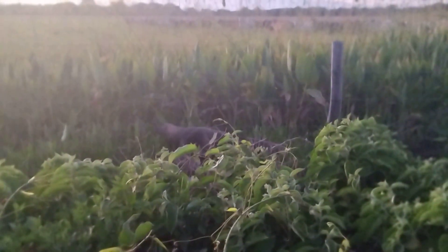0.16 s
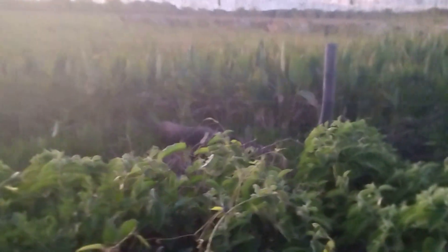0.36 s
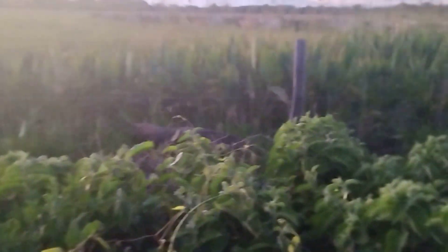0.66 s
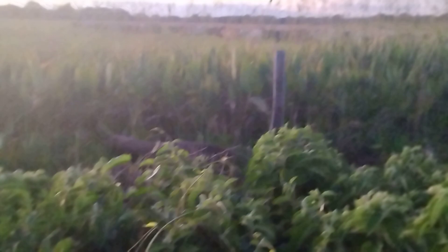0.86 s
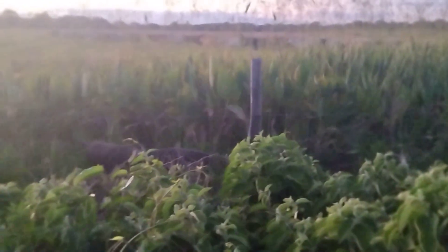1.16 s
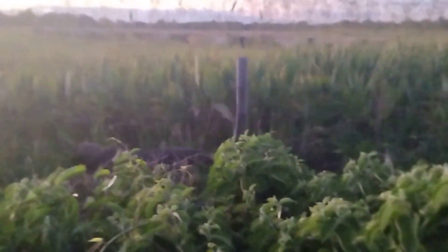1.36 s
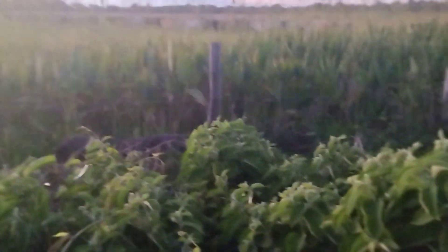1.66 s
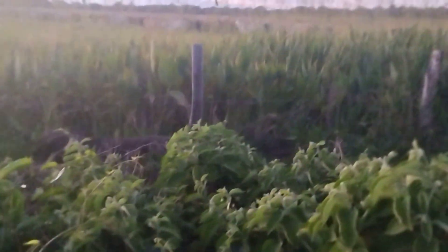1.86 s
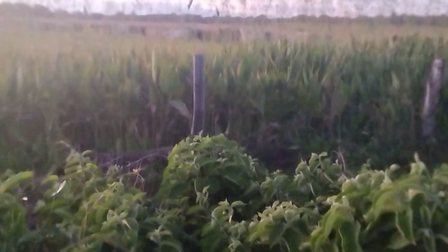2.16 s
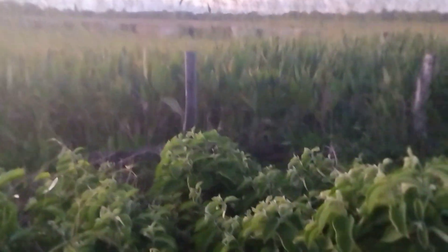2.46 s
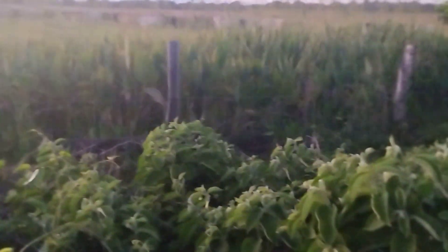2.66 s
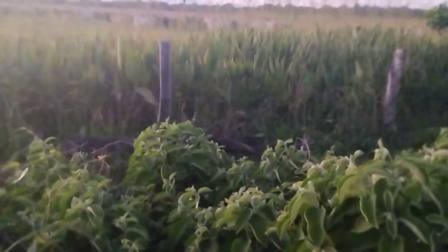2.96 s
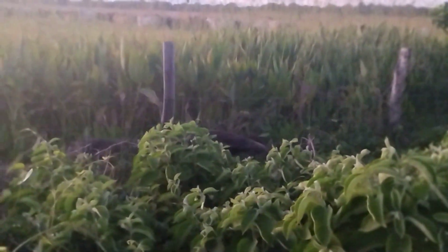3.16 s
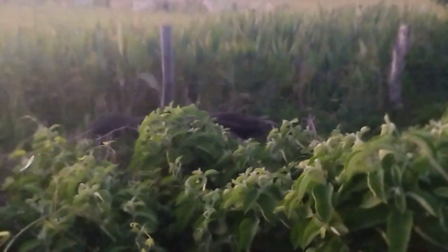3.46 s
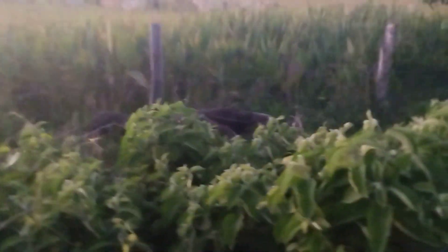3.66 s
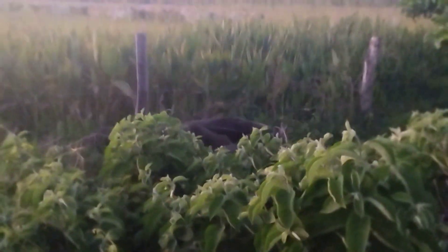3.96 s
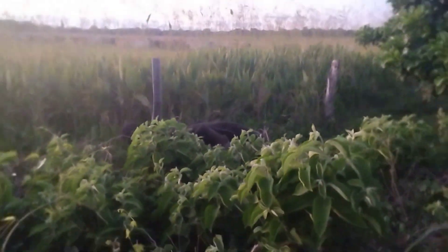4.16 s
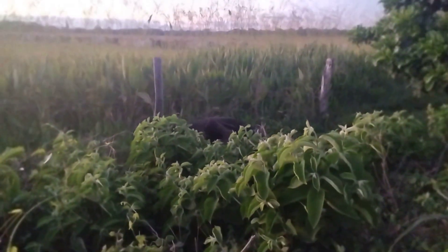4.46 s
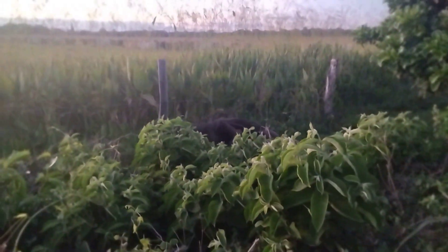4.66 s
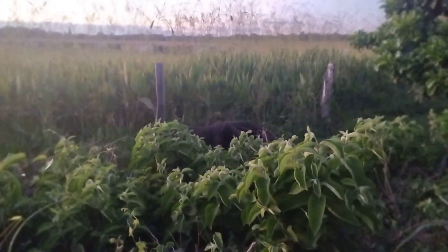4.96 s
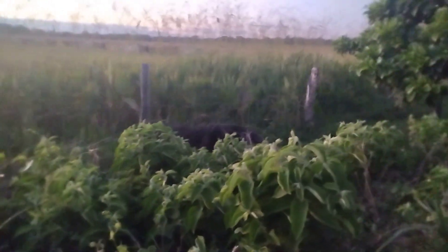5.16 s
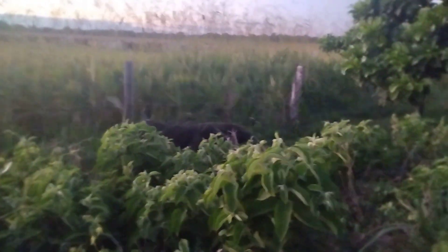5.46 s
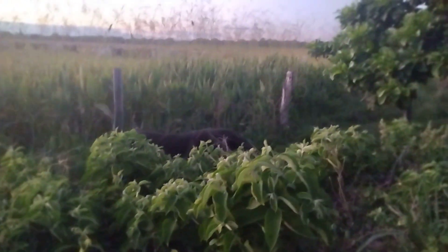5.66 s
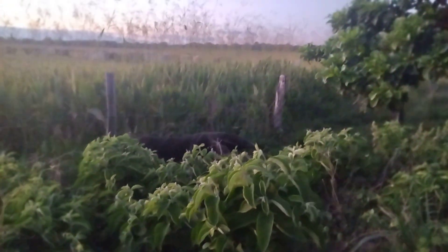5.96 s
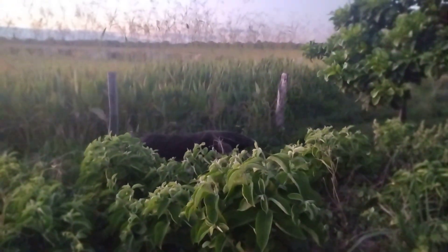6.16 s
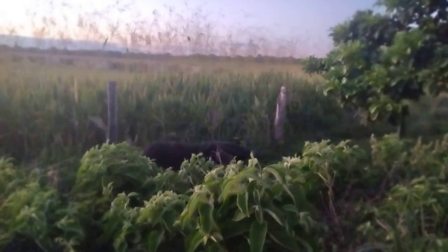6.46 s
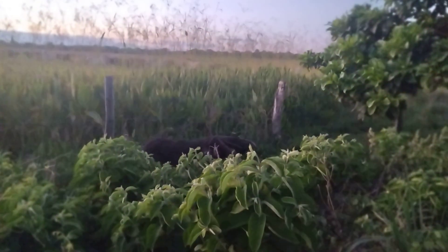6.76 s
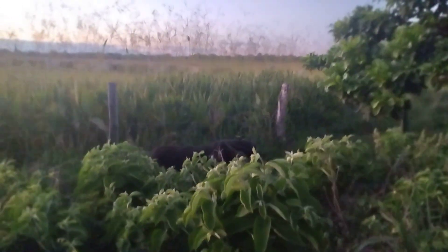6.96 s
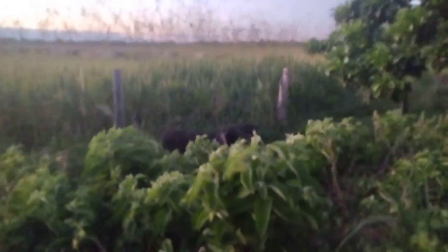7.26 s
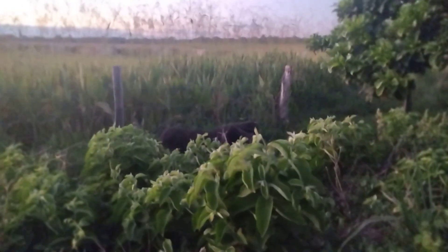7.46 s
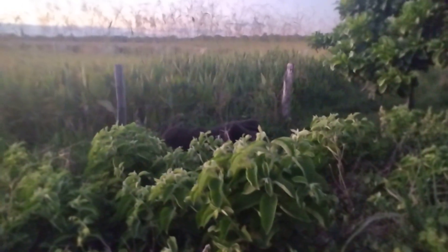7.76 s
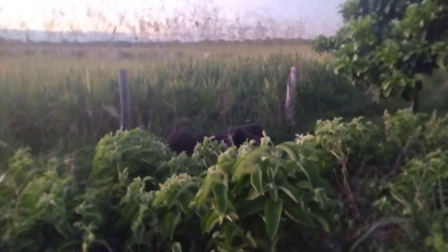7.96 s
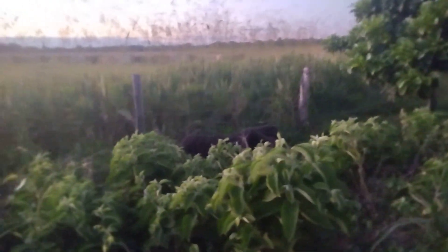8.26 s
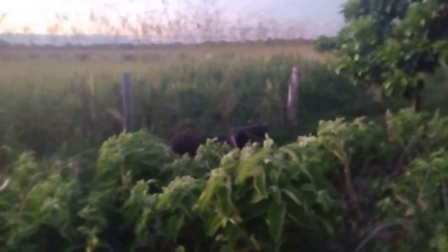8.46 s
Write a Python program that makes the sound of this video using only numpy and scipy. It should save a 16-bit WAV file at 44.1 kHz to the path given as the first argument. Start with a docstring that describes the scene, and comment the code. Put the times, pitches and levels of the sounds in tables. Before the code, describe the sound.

Outdoors in a reedy field, a close cricket trills almost without pause over a shimmering chorus of far insects. A higher, raspier katydid buzzes in half-second phrases, stopping after about five seconds. Faint birds chip and whistle. A single very hard tick hits the microphone near the middle, briefly ducking everything; small stem snaps, knocks and leaf rustles follow. Light air rumble and hiss lie underneath.

```python
"""Dusk at the edge of a reedy field

Air rumbles and hisses faintly under a far insect chorus of noise and a few pulsed tones. A katydid (pulsed
tone and rasp, for five seconds) buzzes above a cricket trilling near 7.5 kHz; leaf echoes scatter both songs.
Birds chip and whistle far off as short gliding tones; filtered noise makes stem snaps and knocks, low thumps
of wind on the microphone and rustling leaves. One hard tick at the microphone rings damped resonances and
makes the recorder's limiter duck."""
import sys
import numpy as np
from scipy import signal
from scipy.fft import rfft, irfft, next_fast_len
from scipy.io import wavfile
from scipy.ndimage import uniform_filter1d, minimum_filter1d, map_coordinates

SR = 44100
rng = np.random.default_rng(int(sys.argv[2]) if len(sys.argv) > 2 else 0)


def persist_wave(psi):
    """Save psi, clipped to +-1, as 16-bit WAV."""
    counts = np.round(np.clip(psi, -1, 1) * 32767).astype(np.int16)
    wavfile.write(sys.argv[1], SR, np.atleast_2d(counts).T)


N = 380123
T = np.arange(N) / SR  # time [s]


def undb(db):
    """Decibels to gain."""
    return 10 ** (np.asarray(db) / 20)


def level(x, db):
    """Set the rms level."""
    return x * undb(db) / np.sqrt(np.mean(x ** 2) + 1e-20)


def curve(rows):
    """Join (time [s], value) rows by straight lines."""
    return np.interp(T, *np.transpose(rows))


def gate(start, end, edge):
    """One between two times, with sloping edges of the given length in seconds."""
    return np.clip(np.minimum(T - start, end - T) / edge + .5, 0, 1)


def walk(rate):
    """Smooth random wander around zero, with spread near one and `rate` knots a second."""
    knots = rng.standard_normal(4096)
    return map_coordinates(knots, [T * rate], order=2, mode="wrap")


def band(x, hz, width):
    """One resonance; a width in Hz sets its damping."""
    return signal.lfilter(*signal.iirpeak(min(hz, .45 * SR), hz / width, fs=SR), x)


def coloured(points):
    """Noise with a (frequency [Hz], relative density [dB]) spectrum that is all but silent beyond its ends."""
    hz, db = np.transpose(points)
    size = next_fast_len(N)
    log_hz = np.log(np.arange(size // 2 + 1) * SR / size + 1)
    shape = undb(np.interp(log_hz, np.log(hz), db, left=-90, right=-90))
    return irfft(rfft(rng.standard_normal(size)) * shape, size)[:N]


def bell(x, centre, width):
    """A smooth hump."""
    return np.exp(-.5 * ((x - centre) / width) ** 2)


def leaves(x, spread_s, sway_rate, count=12):
    """Short echoes off foliage; each comes and goes as the leaves and the listener move."""
    out = np.zeros(N)
    for k in range(count):
        # early echoes crowd together, late ones thin out
        lag = int(SR * spread_s * -np.log(1 - (k + rng.uniform(.2, .9)) / count))
        sway = np.interp(T * sway_rate, np.arange(256), rng.standard_normal(256))
        out[lag:] += (x * sway)[:N - lag]
    return out * np.std(x) / np.std(out)


def add(out, start, sound):
    """Mix a short sound in at a time in seconds."""
    i = max(int(start * SR), 0)
    out[i:i + len(sound)] += sound[:max(N - i, 0)]


def air(land_db=-58, hiss_db=-66):
    """Faint wind and distant land noise with a thin high hiss, all rising and falling with the breeze."""
    # open air: (frequency [Hz], relative density [dB])
    land_spectrum = [(10, 8), (20, -1), (50, -6), (75, -12.5), (160, -14.5), (285, -23.5), (470, -25),
                     (700, -27.5), (1050, -27), (1500, -27.5), (2000, -31.5), (2800, -34.5), (4100, -28.5),
                     (5500, -34.5), (7000, -51)]
    # distant land drone: (frequency [Hz], width [Hz], level before the breeze [dB])
    drone_band = (337, 39, -84.5)
    # strength of the breeze: (time [s], level [dB])
    breeze = [(0, 1), (1.7, 0.2), (2.8, 2), (4, 1.5), (6, .5), (7.6, 0), (8.6, -2.5)]
    land = level(coloured(land_spectrum) * undb(1.0 * walk(4.5)), land_db)
    hz, width, db = drone_band
    drone = level(band(band(rng.standard_normal(N), hz, width), hz, width), db)
    hiss = level(coloured([(5400, -4.4), (9000, 4), (13000, -0.5), (16000, 0.5)]), hiss_db)
    breeze_db = curve(breeze)
    # the hiss follows the breeze twice as strongly
    return (land + drone) * undb(breeze_db) + hiss * undb(2 * breeze_db)


def chorus(pitch_scatter_hz=55, wander_db=-1.0):
    """Many far trills merge into a shimmering band; a few single singers stand out."""
    # far insects: (frequency [Hz], relative density [dB])
    spectrum = [(5600, -60), (6150, -26), (6650, -12.5), (7100, 4), (7600, -2), (8300, -2.5), (9100, -10),
                (10100, -18.5), (11200, -28.5), (12300, -34), (13400, -51), (14400, -27.5), (15600, -31)]
    # the far insects together: (time [s], level [dB])
    loudness = [(0, -42), (2, -41.5), (4, -40.8), (5.3, -41), (5.7, -42.5), (6.3, -40), (7.2, -41.3),
                (7.8, -43.3), (8.6, -43.3)]
    # single far crickets: (start [s], end [s], pitch [Hz], syllable rate [1/s], level [dB])
    neighbours = [(0, 8.62, 7935, 36, -50), (2.1, 7, 8170, 42, -51), (6.15, 8.62, 6800, 84, -52),
                  (2.15, 3.24, 6300, 145, -60)]
    shimmer_db = 1.3 * walk(180) + 1.9 * walk(8)
    out = level(coloured(spectrum) * undb(shimmer_db), 0) * undb(curve(loudness))
    for start, end, pitch_hz, rate, db in neighbours:
        place = T * rate % 1 - .5
        # faster singers sweep wider in each syllable
        hz = pitch_hz - 3 * rate * place + pitch_scatter_hz * walk(150)
        tone = np.sin(2 * np.pi * np.cumsum(hz) / SR)
        syllables = tone * bell(place, 0, 0.29) * undb(wander_db * walk(3.1))
        out += level(syllables, db) * gate(start, end, 0.13)
    return out


def katydid(stroke_hz=136.9, slowing=.042, fall_hz=9500, length=0.081, back_db=-7, rasp=0.24, buzz_db=-2,
            scatter_hz=120, echo_db=-4):
    """A hard, steeply falling stroke and a softer return; the wings slow down through each phrase."""
    # phrases swell, hold and stop short: (start [s], end [s], crest before buzz_db [dB], swelling time [s])
    phrases = [(0, .446, -35.5, 0.18), (.47, .982, -37.5, 0.37), (1.001, 1.526, -38.5, 0.41),
               (1.544, 2.169, -43, 0.47), (2.22, 2.605, -41.5, .25), (2.62, 3.121, -40.5, 0.48),
               (3.14, 3.621, -40.5, .46), (3.65, 4.145, -34, 0.37), (4.206, 4.661, -34, .24),
               (4.725, 5.166, -40, .25)]
    # mean pitch: (time [s], frequency [Hz])
    pitch = [(0, 9760), (1.3, 9800), (3.4, 9660), (4, 9460), (4.6, 9340), (5.1, 9610)]
    swell_db = 6  # a phrase starts this far below its crest
    rate, gain = np.full(N, float(stroke_hz)), np.zeros(N)
    for start, end, crest_db, swell_s in phrases:
        progress = np.clip((T - start) / (end - start), 0, 1)
        rate = np.where(T >= start, stroke_hz * (1 - slowing * progress), rate)
        effort = np.sin(np.pi / 2 * np.clip((T - start) / swell_s, 0, 1)) ** 2
        gain += gate(start, end, .008) * undb(crest_db - swell_db * (1 - effort))
    # even halves are hard strokes, odd halves the returns
    halves = 2 * np.cumsum(rate) / SR
    index = halves.astype(int)
    chance = rng.standard_normal((4096, 2))[index].T
    place = (halves % 1 - .5) / 2  # in whole wing cycles
    hz = curve(pitch) - fall_hz * np.clip(place, -.2, .2) + scatter_hz * chance[0]
    force = bell(place, 0, length) * undb(back_db * (index % 2) + 0.88 * chance[1])
    tone = np.sin(2 * np.pi * np.cumsum(hz) / SR)
    scrape = level(band(band(rng.standard_normal(N), 9200, 2000), 9200, 2000), 0)
    song = gain * level(force * (tone + rasp * scrape), buzz_db)
    return song + undb(echo_db) * leaves(song, 0.017, 4)


def cricket(pitch_hz=7550, fall_hz=620, length=0.17, rough_db=1.0, scatter_hz=25, overtone_db=-35, trill_db=0.59):
    """Each closing of the wings draws the file over the scraper: a near-pure syllable that sags in pitch."""
    # unbroken stretches of the trill: (first syllable [s], last syllable [s])
    bouts = [(.01, .636), (.705, 1.223), (1.292, 1.894), (1.96, 2.315), (2.383, 2.886), (2.953, 3.5),
             (3.57, 4.312), (4.365, 5.07), (5.135, 5.642), (5.711, 7.732), (7.788, 8.61)]
    # the trill drifts as the listener turns: (time [s], level before trill_db [dB])
    loudness = [(0, -37), (1, -32), (1.6, -30.5), (2.1, -35.5), (2.9, -34.5), (3.6, -30), (4.3, -32.5),
                (5.4, -32.5), (5.9, -34.5), (6.2, -43.5), (6.45, -35), (7, -35.5), (7.25, -39), (8.3, -40),
                (8.6, -37)]
    # scattered sound against direct sound, by way of the leaves: (time [s], level [dB])
    scatter = [(0, 3.5), (1.3, -9.5), (3, -8.5), (4.5, -2), (5.72, -11), (6.1, -6), (7, 6), (7.8, -22),
               (8.6, -11)]
    stroke_hz, teeth = 71.5, .15  # wing strokes a second; unevenness of the file's teeth (0-1)
    strokes, singing = np.zeros(N), np.zeros(N)
    for start, end in bouts:
        count = (T - start) * stroke_hz + .5
        # the whole-number offset gives each bout its own random syllables
        strokes = np.where(count >= 0, count + np.ceil(2 * start * stroke_hz), strokes)
        singing += gate(start - .005, end + .005, .003)
    chance = rng.standard_normal((4096, 3))[strokes.astype(int)].T
    place = strokes % 1 - .5
    hz = pitch_hz + scatter_hz * chance[1] - fall_hz * place + 18 * walk(3)
    angle = 2 * np.pi * np.cumsum(hz) / SR
    # uneven teeth roughen the syllable
    force = bell(place, 0.035 * chance[0], length) * undb(rough_db * chance[2]) * (1 + teeth * walk(900))
    # the wing's inertia rounds off every jolt
    force = uniform_filter1d(force, size=24)
    tone = np.sin(angle) + undb(overtone_db) * np.sin(2 * angle)
    song = singing * undb(curve(loudness)) * level(force * tone, trill_db)
    share = undb(curve(scatter))
    return (song + share * leaves(song, .007, 3.7)) / np.sqrt(1 + share ** 2)


def chips(chip_db=-5.5, chip_s=.008, fall_hz=9000, rasp_hz=190, flock_db=-64, count=45):
    """Short hoarse falling chips from birds in the reeds; a farther flock fills the gaps."""
    # the nearer bird: (time [s], peak before chip_db [dB], pitch [Hz])
    near = [(1.522, -55, 4180), (2.7117, -57, 4290), (3.1807, -53, 4240), (3.4184, -49, 4310),
            (3.486, -46, 4110), (3.8833, -54, 4050), (5.7503, -47.5, 4310), (6.1305, -55, 4130),
            (6.3634, -53, 3980), (7.6027, -53.5, 3920), (8.325, -55.5, 3890), (8.578, -50, 3880)]
    out, t = np.zeros(N), T[:SR // 20]
    flock = [(a * T[-1], flock_db + 6 * b, 4050 + 500 * c) for a, b, c in rng.random((count, 3))]
    for start, db, hz in list(near) + flock:
        rasp = level(uniform_filter1d(rng.standard_normal(len(t)), size=40), 0)
        # fall_hz is the drop per second
        sweep = hz - fall_hz * (t - 2 * chip_s) + rasp_hz * rasp
        tone = np.sin(2 * np.pi * np.cumsum(sweep) / SR)
        add(out, start - chip_s, undb(db + chip_db) * bell(t, 2 * chip_s, chip_s) * tone)
    return out + undb(-5) * leaves(out, .022, 3)


def whistles(waver_hz=14, echo_db=-17):
    """Thin bird whistles, mostly falling: wavering tones with rounded ends and faint leaf echoes."""
    # (start [s], end [s], first pitch [Hz], last pitch [Hz], how early the pitch moves, level before trim [dB])
    calls = [(1.1, 1.323, 5800, 4100, .3, -77), (1.928, 2.152, 3120, 2960, 1.4, -77),
             (2.768, 2.955, 4540, 3620, .6, -58.5), (3.042, 3.26, 3150, 3000, 4.2, -65.5),
             (3.265, 3.302, 2910, 2580, .5, -56.5), (3.394, 3.566, 4280, 3395, 10, -53.5),
             (3.647, 3.715, 3750, 2700, .7, -60), (3.734, 3.819, 2420, 1930, .7, -60),
             (3.94, 4.08, 3670, 3580, 2.2, -74), (4.143, 4.23, 3590, 3560, 1, -70),
             (4.496, 4.647, 3600, 3610, 1.03, -73), (5.06, 5.206, 5240, 4200, .3, -74),
             (6.426, 6.65, 3680, 3650, 1.2, -75), (6.912, 6.97, 5800, 3220, 1, -59),
             (7.12, 7.149, 5760, 4100, 1, -58.5)]
    out, waver = np.zeros(N), waver_hz * walk(61)
    for start, end, first, last, bend, db in calls:
        u = np.linspace(0, 1, int((end - start) * SR))
        # an exponential glide that runs from one to zero
        glide = (np.exp(-bend * u) - np.exp(-bend)) / (1 - np.exp(-bend))
        hz = last + (first - last) * glide + waver[:len(u)]
        swell = np.abs(np.sin(np.pi * u ** 1.1)) ** 0.21
        add(out, start, level(np.sin(2 * np.pi * np.cumsum(hz) / SR) * swell, db))
    # flicker, and a trim of the whole layer
    out *= undb(2 * walk(35) - 3.5)
    return out + undb(echo_db) * leaves(out, 0.023, 2.26)


def snaps_thumps_and_rustles(grain_db=6):
    """Short noise bursts ring as stem snaps, knocks and low wind thumps; brushed leaves crackle in grains."""
    # stem snaps and knocks, and low thumps of wind on the microphone:
    # (time [s], peak [dB], ring [Hz], width [Hz])
    bursts = [(1.69, -52, 60, 60), (3.633, -41.5, 1107, 1090), (3.741, -31, 1050, 406),
              (3.806, -42, 1970, 1800), (3.923, -43, 157, 90), (3.924, -41, 447, 218),
              (4.485, -45, 1195, 1800), (5.216, -50.5, 175, 150), (5.45, -33, 6000, 9000),
              (5.474, -25, 6000, 9000), (5.644, -39, 4460, 5000), (6.495, -50.5, 169, 200),
              (6.999, -27.5, 1004, 403), (7.0, -40, 450, 350), (7.197, -41.5, 480, 450),
              (7.198, -26.5, 3150, 5000), (7.39, -42, 2270, 1090), (8.227, -40.5, 1420, 1980)]
    # brushed leaves: (start [s], end [s], level [dB], centre [Hz], width [Hz])
    rustles = [(4.233, 4.358, -59.5, 4400, 4500), (4.262, 4.34, -64.5, 1440, 1500),
               (5.208, 5.369, -66.5, 1070, 1280), (5.201, 5.298, -63, 4400, 3940),
               (5.489, 5.66, -60.5, 3180, 6100), (6.179, 6.205, -52, 9300, 3000),
               (7.006, 7.047, -58.5, 2460, 3000), (7.933, 7.949, -52, 9800, 3490)]
    burst_cycles = 12  # a burst dies by 60 dB in this many ring periods, so low ones last longer
    crack_db, crack_spread = -20, 3.3  # broader noise under each ring: filter gain, and width in ring widths
    out, t = np.zeros(N), T[:SR // 6]
    for start, db, hz, width in bursts:
        push = rng.standard_normal(len(t)) * np.exp(-np.log(1000) * t * hz / burst_cycles) + 1e-18
        crack = band(push, hz, min(crack_spread * width, SR / 4))
        ring = band(band(push, hz, width), hz, width) + undb(crack_db) * crack
        add(out, start, undb(db) * ring / np.abs(ring).max())
    for start, end, db, hz, width in rustles:
        noise = rng.standard_normal(SR // 2)
        # each grain lasts about a millisecond
        sizes = np.repeat(undb(grain_db * rng.standard_normal(512)), SR // 1000)
        n = int((end - start) * SR)
        grains = noise[:n] * sizes[:n] * signal.windows.tukey(n)
        add(out, start, level(band(band(grains, hz, width), hz, width), db))
    return out


def tick(tick_s=3.7027):
    """A single hard contact right at the microphone rings a few heavily damped resonances."""
    # resonances: (frequency [Hz], width [Hz], peak [dB])
    modes = [(1860, 1700, -22), (6840, 1850, -1), (13400, 8700, 3.5)]
    out, push = np.zeros(N), signal.unit_impulse(SR // 100)
    for hz, width, db in modes:
        ring = band(band(push, hz, width), hz, width)
        add(out, tick_s, undb(db) * ring / np.abs(ring).max())
    return out


def scene():
    """All sources at one microphone."""
    field = air() + chorus() + katydid() + cricket()
    return (field + chips() + whistles() + snaps_thumps_and_rustles() + tick())[None]


def record(dry):
    """The recorder cuts the top; its limiter ducks everything for a moment after a loud peak."""
    top_hz, ceiling_db = 15750, -1.5
    hold_s, slide_s = .085, .002  # how long the gain stays down; time to slide between gains
    top = signal.ellip(10, .2, 70, top_hz, fs=SR, output="sos")
    hold, slide = int(hold_s * SR), int(slide_s * SR)
    allowed = np.minimum(1, undb(ceiling_db) / (np.abs(signal.sosfilt(top, dry)) + 1e-9))
    # the gain drops just before a peak and stays down after it
    held = minimum_filter1d(allowed, hold, origin=hold // 2 - slide)
    return signal.sosfilt(top, dry * uniform_filter1d(held, slide))


dry = scene()
out = record(dry)
persist_wave(out)
```